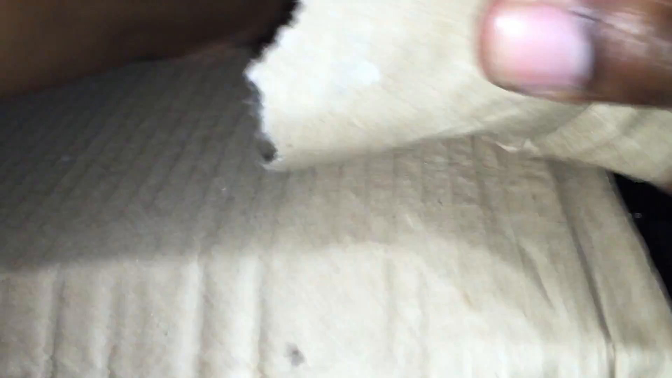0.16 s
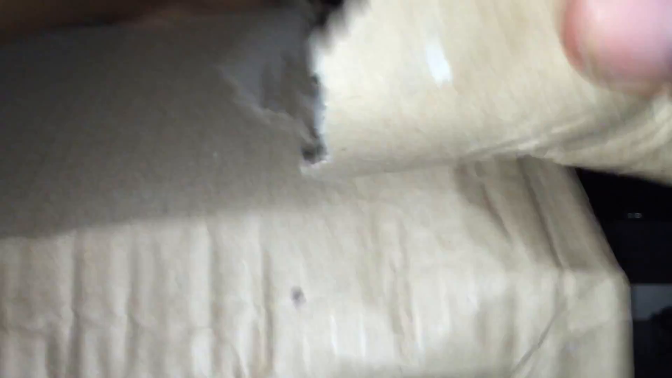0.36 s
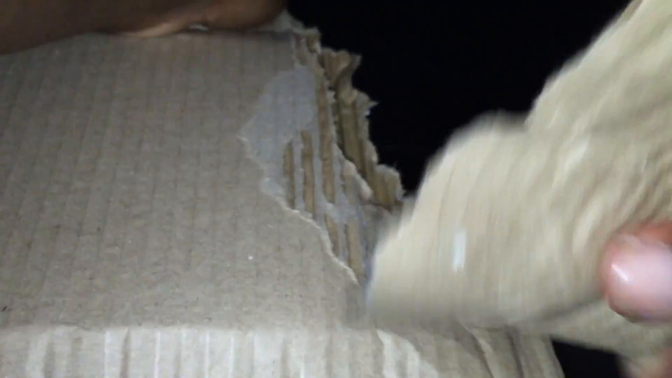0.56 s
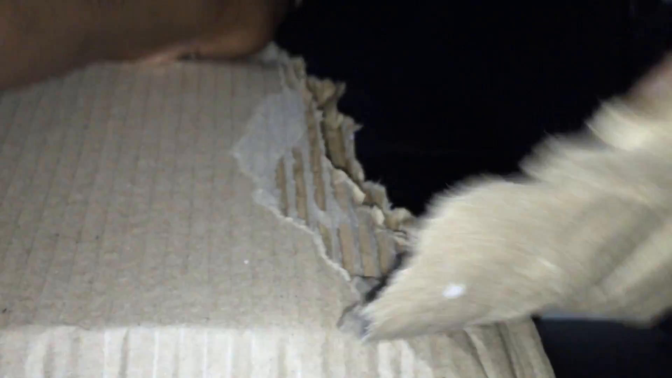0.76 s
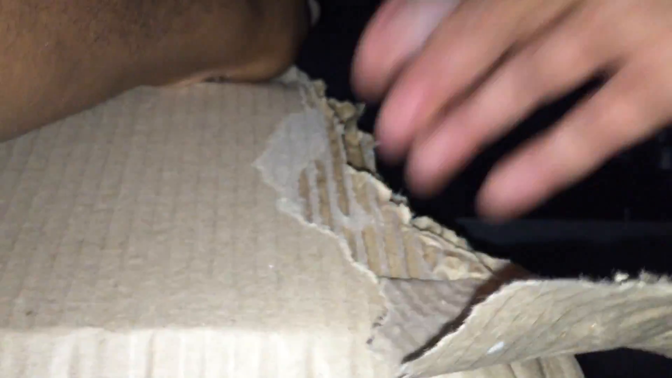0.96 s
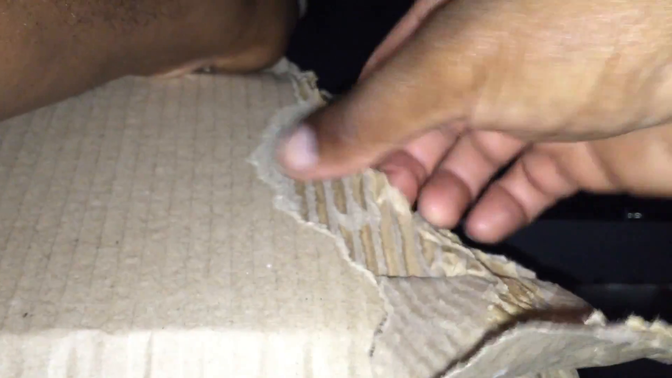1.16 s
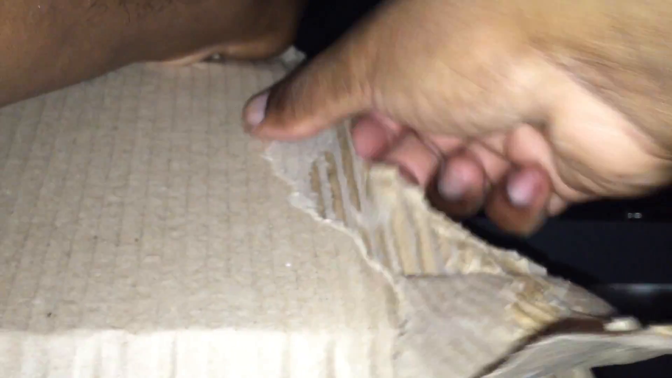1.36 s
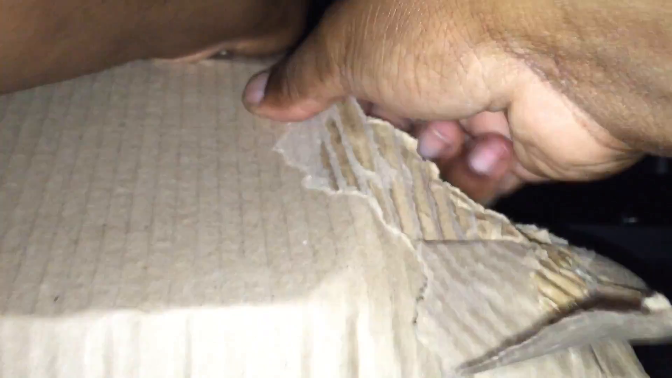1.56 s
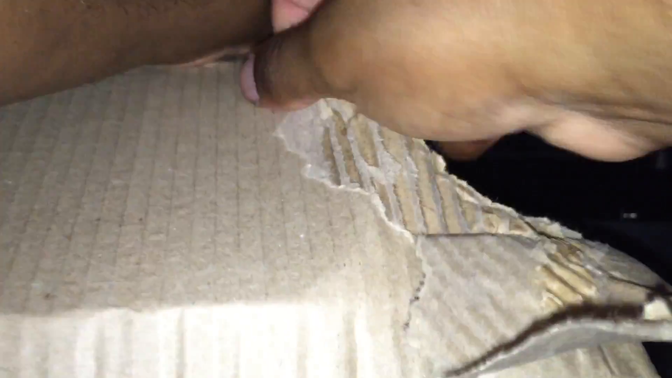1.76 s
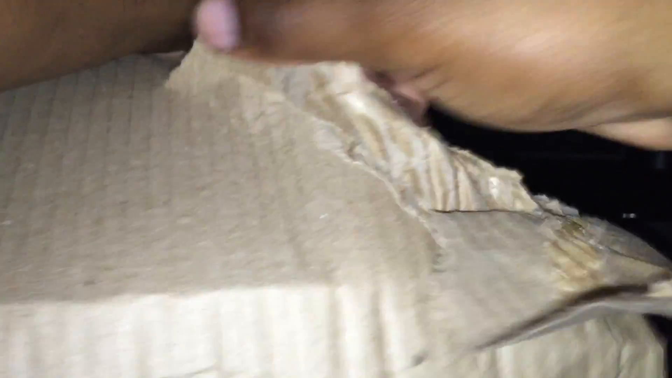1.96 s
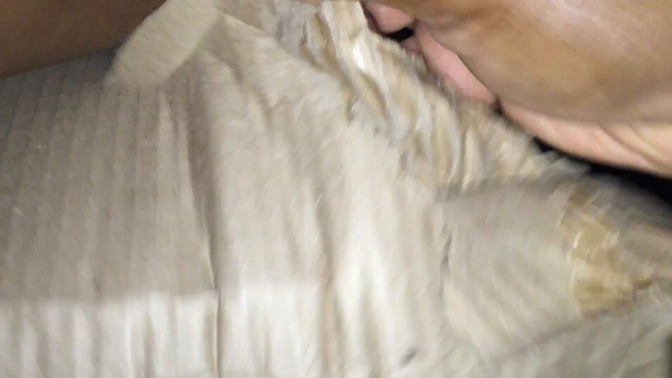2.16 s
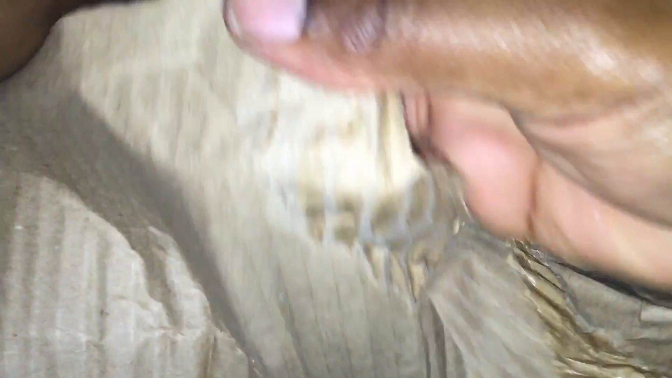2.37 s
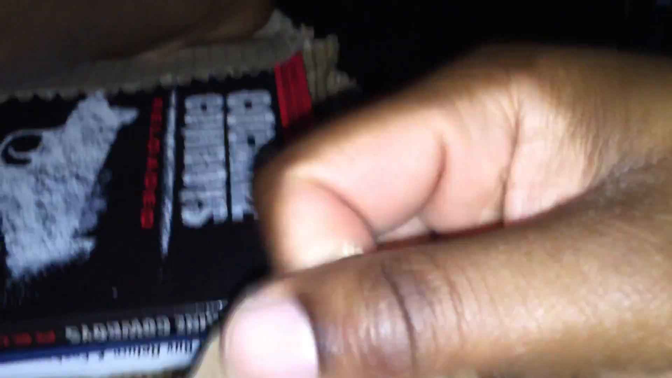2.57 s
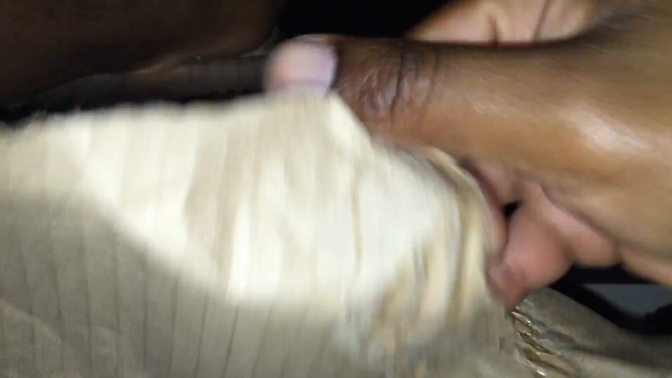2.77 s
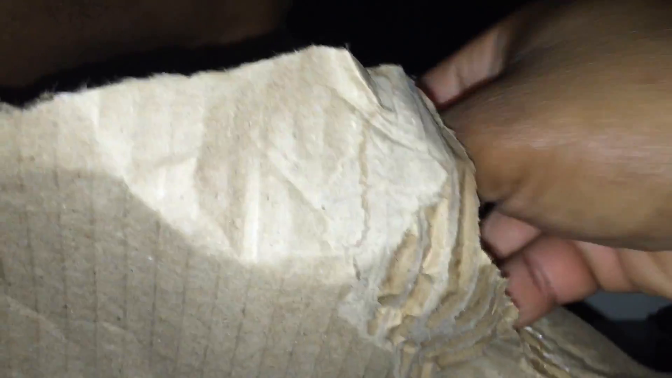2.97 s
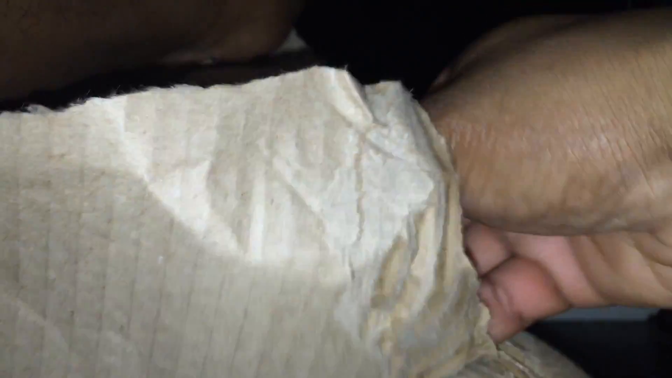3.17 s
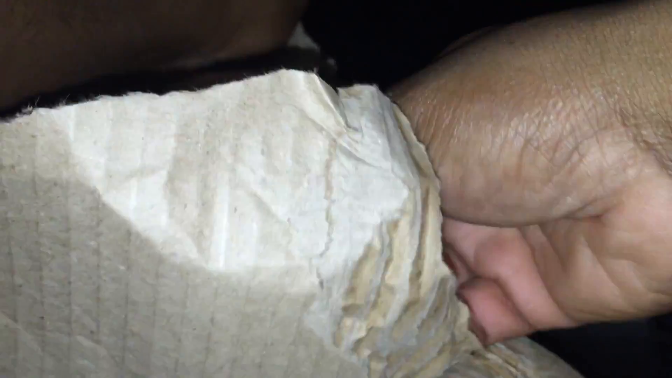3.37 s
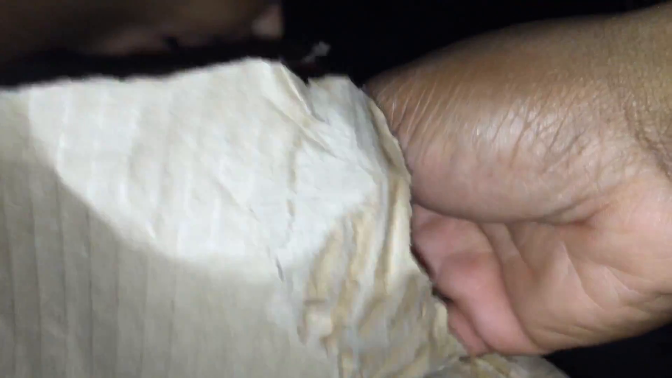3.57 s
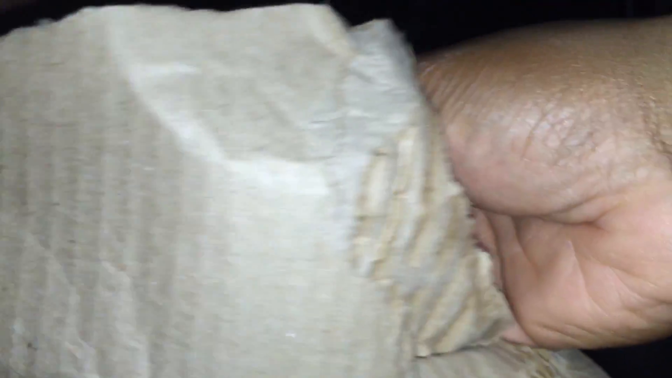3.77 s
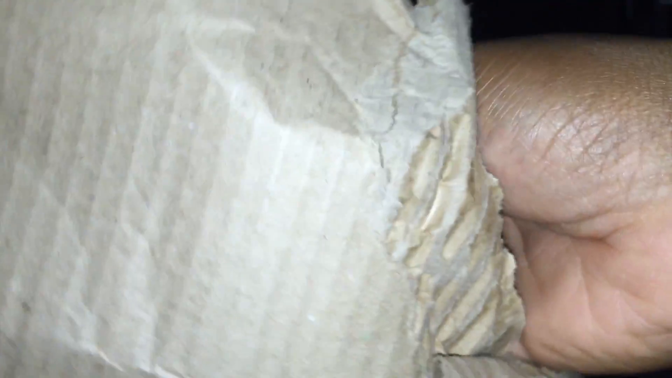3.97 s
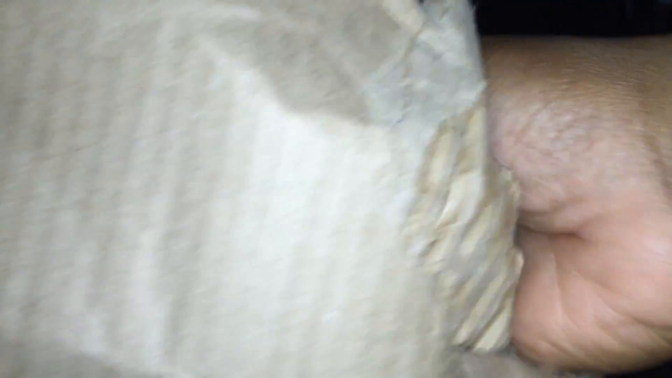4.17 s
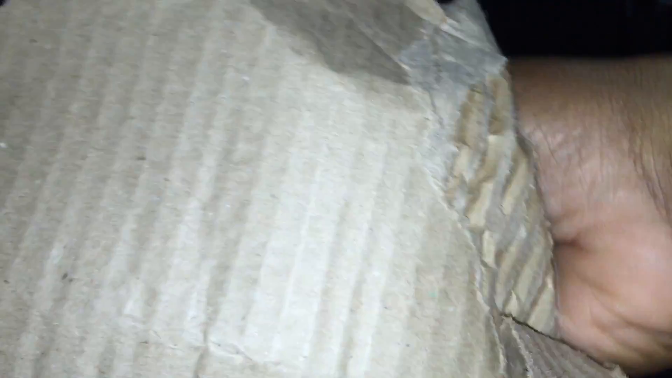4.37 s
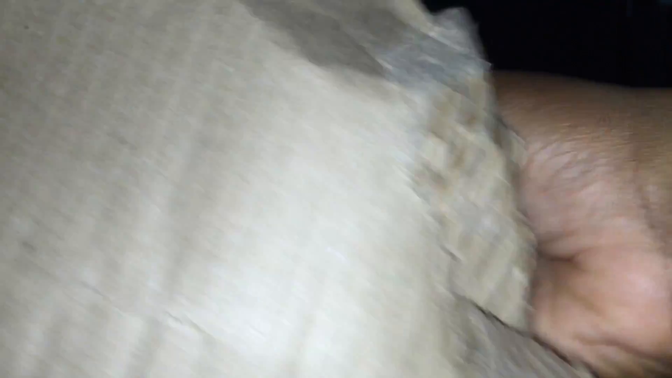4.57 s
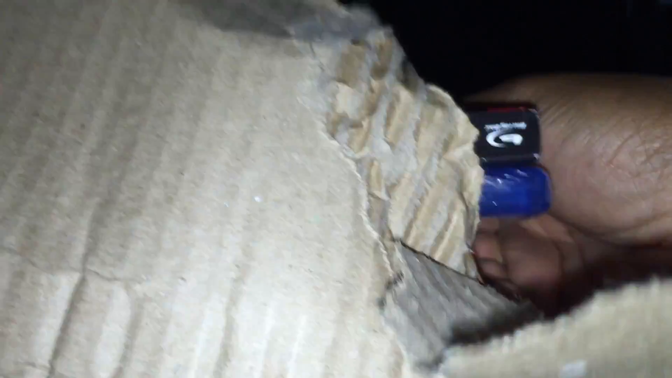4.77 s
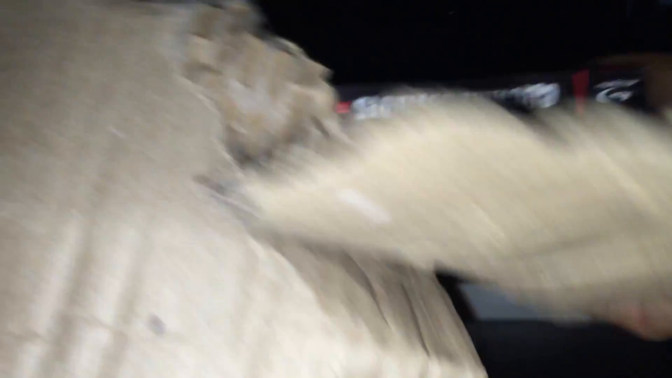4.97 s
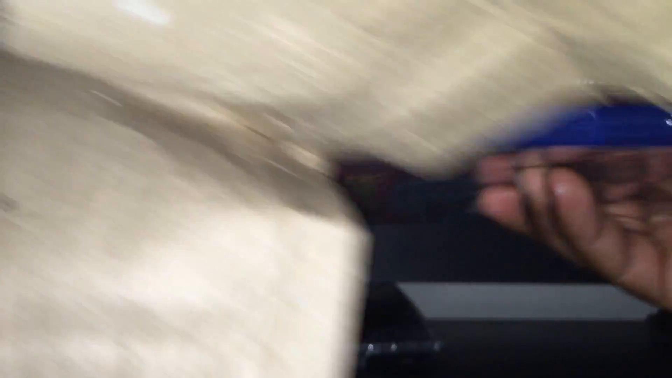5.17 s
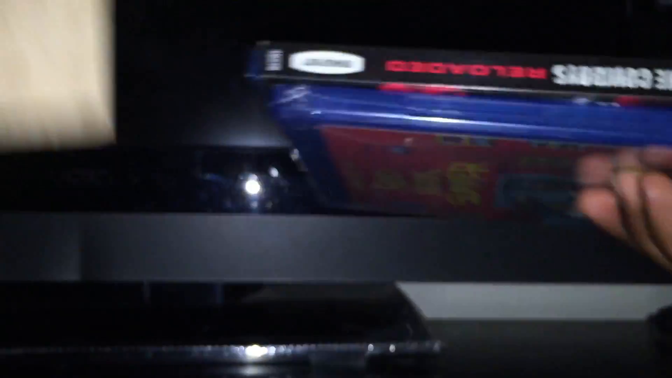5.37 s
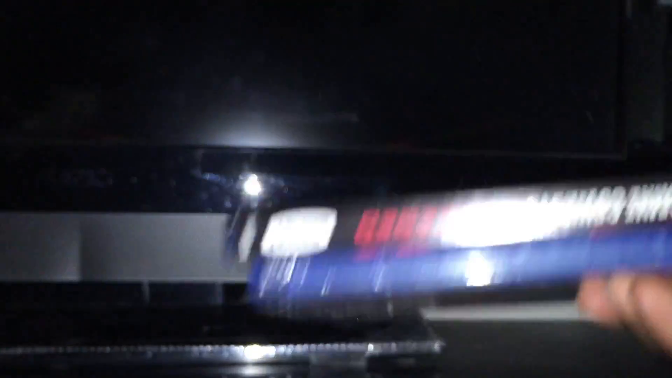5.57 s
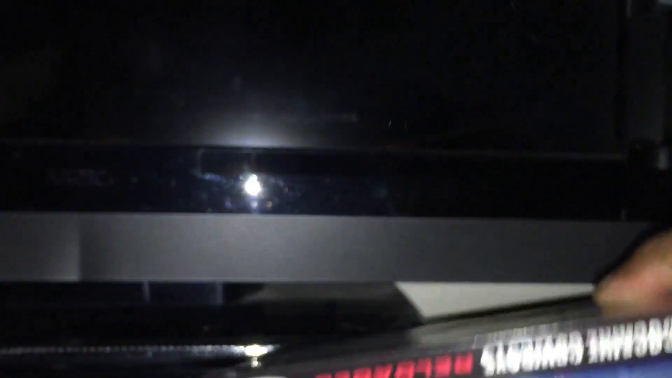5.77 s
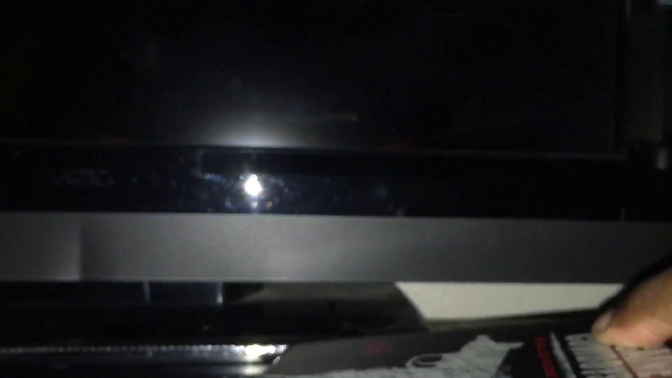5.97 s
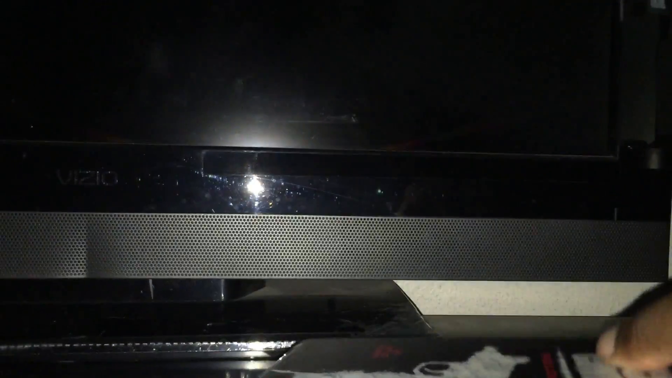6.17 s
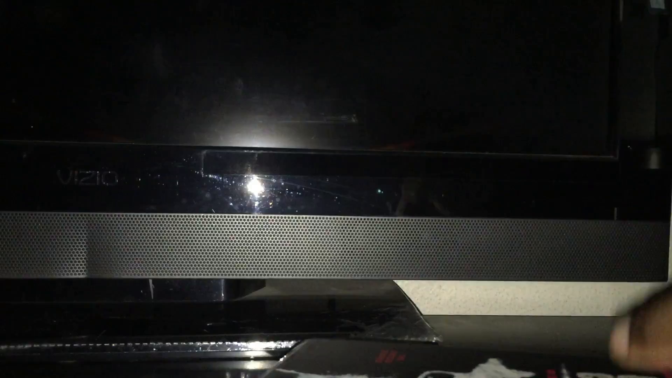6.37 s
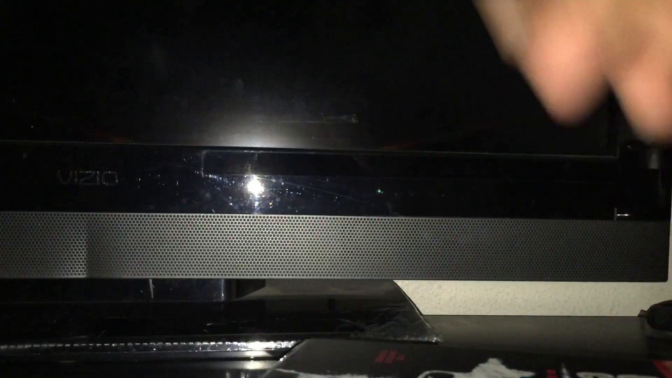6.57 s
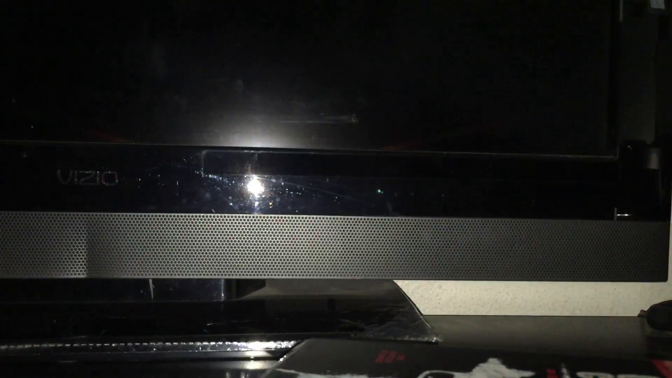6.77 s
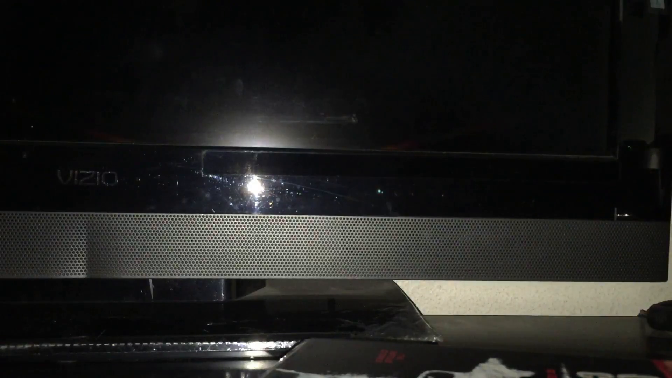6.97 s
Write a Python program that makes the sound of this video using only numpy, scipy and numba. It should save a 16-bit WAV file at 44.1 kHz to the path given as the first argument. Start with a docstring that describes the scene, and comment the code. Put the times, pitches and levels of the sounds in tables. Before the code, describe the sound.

Coarse, crackling rips of thick cardboard open the scene, with low panel thuds underneath. Quiet handling and little creases lead to a second, denser run of tearing. Then skin and plastic drag over paper in uneven strokes, growing toward the pull-out, with tiny clicks. Finally a light plastic case taps and clacks onto a shelf. Close dry microphone, short room tail, faint still air.

```python
"""A corrugated cardboard wrapper is ripped open by hand, close to the microphone in a small room.
Dense bursts of fibre clicks ring the loose flap, flutes crack and the panels flex with low thuds.
Friction grains and crinkles follow the hand, and a plastic disc case that is slid out, its edge clicking.
Damped modes knock as the case is set down on a shelf; a short room tail and still air lie around it all."""
import sys
import numpy as np
from scipy import signal
from scipy.fft import rfft, irfft, next_fast_len
from scipy.io import wavfile
from scipy.ndimage import map_coordinates
from numba import njit

SR = 44100
rng = np.random.default_rng(int(sys.argv[2]) if len(sys.argv) > 2 else 0)


def int16_out(signal):
    """Quantize to a 16-bit WAV file."""
    q = np.round(np.clip(np.atleast_2d(signal).T, -1, 1) * 32767)
    wavfile.write(sys.argv[1], SR, q.astype(np.int16))


N = 309581
T = np.arange(N) / SR

# the pulls that make up each rip, one list a rip, levels ahead of the layer trims:
# start_s, attack_s, hold_s, level_db, panel_flex_db (relative), treble_db (relative)
RIPS = [
    [(0.0, 0.001, 0.039, -17.5, -4, -5.5)],
    [(.118, 0.0034, 0.053, -37, -14.5, -0.5), (.13, 0.11, 0.019, -19, -6.5, -2),
     (.26, 0.017, .03, -23.5, -4.5, -7)],
    [(.355, .06, 0.022, -34, -18, -2.5), (.41, 0.032, 0.025, -24.5, -16, -3),
     (.453, 0.0041, .028, -19, -11, -5), (.505, 0.0027, 0.0041, -20.5, -11, -6)],
    [(1.805, 0.021, 0.061, -34.5, -8, 2), (1.89, 0.057, 0.015, -33.5, -19.5, -1.5),
     (1.962, .025, 0.046, -18.5, -8, -2.5)],
    [(2.225, .012, .018, -35, -13, 2.5), (2.25, 0.025, 0.067, -19, -26, -5.5),
     (2.335, 0.018, 0.035, -17, -19.5, -6.5), (2.38, 0.032, 0.066, -21, -11.5, -5)],
    [(2.518, .022, .014, -25.5, -8, -3.5), (2.562, .016, .012, -19, -7, -5),
     (2.6, 0.007, 0.011, -27, -13.5, -3), (2.621, .004, 0.018, -17.5, -9.5, -7),
     (2.65, 0.0091, 0.026, -31, -11, -4.5)],
]


def undb(db):
    """Decibels to gain."""
    return 10 ** (np.asarray(db) / 20)


def unit(x):
    """Scale to rms 1."""
    return x / np.sqrt(np.mean(x ** 2) + 1e-20)


def unit_hit(x):
    """Scale a short sound to the energy of 10 ms at rms 1."""
    return x / np.sqrt(np.sum(x ** 2) / (SR / 100))


def add(out, start_s, x):
    """Mix x into out from start_s on."""
    i = max(int(start_s * SR), 0)
    out[i:i + len(x)] += x[:max(len(out) - i, 0)]


def colour(x, points):
    """Filter by an outline of (Hz, dB) points, joined along log frequency."""
    hz, db = np.transpose(points)
    size = next_fast_len(len(x))
    f = np.maximum(np.fft.rfftfreq(size, 1 / SR), 1)
    gain = undb(np.interp(np.log(f), np.log(hz), db))
    return irfft(rfft(x, size) * gain, size)[:len(x)]


def band(x, lo_hz, hi_hz):
    """Causal band-pass."""
    edges = [lo_hz, min(hi_hz, SR / 2 - 100)]
    return signal.sosfilt(signal.butter(2, edges, "band", fs=SR, output="sos"), x)


def split(x, hz):
    """The parts below and above hz, without phase shift."""
    low = signal.sosfiltfilt(signal.butter(4, hz, fs=SR, output="sos"), x)
    return low, x - low


def resonate(x, peaks):
    """Parallel resonances (Hz, width Hz, dB), none narrower than 40 Hz."""
    out = 0
    for hz, width, db in peaks:
        b, a = signal.iirpeak(hz, hz / np.clip(width, 40, hz), fs=SR)
        out = out + undb(db) * signal.lfilter(b, a, x)
    return out


def walk(n, rate):
    """Slow chance with a spread near 1, from rate random knots a second."""
    knots = rng.standard_normal(int(n * rate / SR) + 2)
    return np.sqrt(3 / 2) * np.interp(np.arange(n) * rate / SR, np.arange(len(knots)), knots)


def swell(t, rise_s, decay_s):
    """A quick build-up and an exponential decay."""
    return (1 - np.exp(-(t / rise_s) ** 2)) * np.exp(-t / decay_s)


def snaps(n, rate, spread_db):
    """Random tiny clicks, rate a second, many small and a few large."""
    size = undb(spread_db * np.minimum(rng.exponential(size=n), 4))
    return (rng.random(n) < rate / SR) * size * rng.choice([-1, 1], n)


def burst(t, rise_s, decay_s):
    """A short spray of tiny breaks: random signs under a swell."""
    return rng.choice([-1, 1], len(t)) * swell(t, rise_s, decay_s)


def crackle(n, rate, mid_hz, ring_s, spread_db):
    """Coarse fibre bundles give way one by one, each pinging a scrap of paper of its own size."""
    out, t = np.zeros(n), T[:SR // 60]
    for when, pitch, size in rng.random((max(int(rate * n / SR), 1), 3)):
        hz = mid_hz * 2 ** (3.4 * (pitch - .5))
        ping = np.sin(2 * np.pi * hz * t) * swell(t, rise_s=0.0002, decay_s=ring_s)
        # higher pings are weaker
        add(out, when * n / SR, undb(spread_db * size) * ping * np.sqrt(mid_hz / hz))
    return unit(out)


def flicker(x, depth_db, rate):
    """Every bunch of fibres has its own colour: the octaves swell separately."""
    out = 0
    for hz in 700 * 2 ** np.arange(5):
        low, x = split(x, hz)
        out = out + low * undb(depth_db * walk(len(x), rate))
    return out + x


def bend(x, share, rate):
    """A bending sheet lets its resonances wander in pitch: time is stretched a little, to and fro."""
    i = np.arange(len(x))
    return map_coordinates(x, [i + np.cumsum(share * walk(len(x), rate))], order=3, mode="mirror")


@njit
def glide(x, hz, q):
    """State-variable band-pass whose centre moves."""
    y, b, l = np.empty(len(x)), 0., 0.  # output, band state, low state
    for i in range(len(x)):
        g = np.tan(np.pi * hz[i] / SR)
        v = (b + g * (x[i] - l)) / (1 + g * (g + 1 / q))
        b, l, y[i] = 2 * v - b, l + 2 * g * v, v / q
    return y


def still_air(level_db=-67.5):
    """Still air of the room: steady coloured noise."""
    # noise outline: pitch_hz, level_db
    air_outline = [(15, -49), (25, -13), (42, -2.5), (65, 6), (91, -7.5), (372, -19), (460, -20.5),
                   (703, -22), (4030, -28.5), (12900, -35.5), (14000, -36)]
    return undb(level_db) * unit(colour(rng.standard_normal(N), air_outline))


def effort(rows, sag_db_s, release_db_s, curve=1.006):
    """Each move builds up, holds while easing a little, and dies away; gains of body, panel flex and treble."""
    start, attack, hold, level_db, flex_db, treble_db = np.transpose(rows)[:, :, None]
    coarse = T[::40]
    t = coarse - start - attack
    rise = np.clip(1 + t / np.maximum(attack, 1 / SR), 0, 1) ** curve
    fall_db = sag_db_s * np.clip(t, 0, hold) + release_db_s * np.maximum(t - hold, 0)
    gain = rise * undb(level_db - fall_db)
    # overlapping moves add in power
    return np.array([np.interp(T, coarse, np.linalg.norm(gain * undb(db), axis=0))
                     for db in (0, flex_db, treble_db)])


def flex(n, rate, jerk_db, face_db=-3):
    """The panels give way in small jerks, each a low thud that sets the broad face ringing."""
    # colour of the flexing panels: pitch_hz, level_db
    panel_outline = [(25, -25), (50, 0.5), (80, -3.5), (120, 0.5), (180, -2), (240, -6), (320, -7.5),
                     (450, -11), (900, -38)]
    # resonances of the wrapper's broad face: pitch_hz, width_hz (40 at least), level_db
    face_peaks = [(105.9, 74, -2), (194, 45, 1.5), (338, 35, 2)]
    jerks = snaps(n, rate, spread_db=1.5) * undb(jerk_db * walk(n, rate=36))
    thuds = colour(jerks, panel_outline)
    return unit(unit(thuds) + undb(face_db) * unit(resonate(thuds, face_peaks)))


def tearing(rips, tear_db=-1.4, flap_db=-3, bundle_db=-6, flute_db=-9, flex_db=-4, treble_db=0):
    """Fibres snap by the thousand, in bunches as the tear catches on the flutes; they ring the flap."""
    # resonances of the flap, which changes size from rip to rip: pitch_hz, width_hz, level_db
    flap_peaks = [
        [(863, 83, -1), (1340, 100, 4), (2390, 400, 4), (3280, 79, 15), (6330, 400, -3)],
        [(872, 220, -10.5), (2285, 240, 5), (3280, 190, 5), (6470, 790, -12.5)],
        [(922, 130, -8), (2380, 240, 11), (3380, 260, 2), (5970, 1000, -13)],
        [(1260, 280, 0.5), (1950, 370, 10), (3155, 200, 13), (4080, 330, -9), (5200, 780, -14)],
        [(950, 60, 12), (1800, 400, -1.5), (3100, 960, 2.5), (3970, 930, -7)],
        [(700, 370, 6.5), (2170, 110, 11.5), (2790, 490, 11.5), (3810, 350, 5.5), (6660, 670, 6)],
    ]
    # colour of snapping fibres: pitch_hz, level_db
    fibre_outline = [(150, -35.5), (250, -1), (496, -5.5), (919, 1.5), (1050, -3), (1650, -6), (2240, -0.5),
                     (2950, 2), (3380, 1), (4930, -7), (6480, -9), (10500, -14), (13500, -13.5),
                     (15000, -17)]
    out = np.zeros(N)
    n = SR // 2  # each rip gets half a second
    for pulls, gains, flap in zip(RIPS, rips, flap_peaks):
        start = max(pulls[0][0], 0)
        body_gain, flex_gain, treble_gain = gains[:, int(start * SR):][:, :n]
        catch = undb(0.31 * walk(n, rate=130) + 2.0 * walk(n, rate=600))
        fibres = flicker(snaps(n, rate=5000, spread_db=2.5) * catch, depth_db=-0.5, rate=81)
        body, treble = split(colour(fibres, fibre_outline), hz=5270)
        ring = bend(resonate(fibres, flap), share=.005, rate=35)
        bundles = crackle(n, rate=350, mid_hz=3857, ring_s=0.0021, spread_db=10)
        flutes = crackle(n, rate=76, mid_hz=1580, ring_s=0.0018, spread_db=6.5)
        body = unit(body) + undb(flap_db) * unit(ring)
        body = unit(body + undb(bundle_db) * bundles + undb(flute_db) * flutes)
        rip = body_gain * undb(tear_db) * body
        rip = rip + treble_gain * undb(treble_db) * unit(treble)
        rip = rip + flex_gain * undb(flex_db) * flex(n, rate=900, jerk_db=2.5)
        add(out, start, rip)
    return out


def crack(body_db, hz, thud_db, snap_db, ring_db=0, sag_db=-10, sag_hz=80):
    """A sharp snap, a brief ring and a low thud, as when a flute buckles and its liner and panel answer."""
    t = T[:SR // 12]
    ring = np.sin(2 * np.pi * hz * t) * swell(t, rise_s=0.00095, decay_s=0.002)
    # a larger, lower-ringing patch also gives a duller crack
    top_hz = np.clip(2.28 * hz, 900, 4200)
    spray = unit_hit(band(burst(t, rise_s=0.0011, decay_s=.0018), 600, top_hz))
    body = unit_hit(spray + undb(ring_db) * unit_hit(ring))
    snap = unit_hit(band(burst(t, rise_s=0.001, decay_s=0.00095), 2400, 13500))
    thud = unit_hit(band(burst(t, rise_s=0.0013, decay_s=0.0081), 110, 270))
    # the panel springs back and swings a few slow cycles
    sag = unit_hit(np.sin(2 * np.pi * sag_hz * t) * swell(t, rise_s=0.005, decay_s=0.015))
    thud = unit_hit(thud + undb(sag_db) * sag)
    return undb(body_db) * body + undb(snap_db) * snap + undb(thud_db) * thud


def small_cracks(work, rate=18, top_db=-5.5, spread_db=4, mid_hz=1710, thud_db=-10, snap_db=-6, spread_oct=.6):
    """Lesser creases give way at random, rate a second, as strongly as the card is being worked."""
    out = np.zeros(N)
    for when, size, pitch in rng.random((int(rate * N / SR), 3)):
        hz = mid_hz * 2 ** (spread_oct * (2 * pitch - 1))
        gain = work[int(when * N)] * undb(top_db + spread_db * (2 * size - 2))
        add(out, when * N / SR, gain * crack(0, hz, thud_db, snap_db))
    return out


def cracks_and_edge_clicks(body_db=0, thud_db=0, snap_db=0):
    """Flutes and creases buckle; the last four are clicks of the case edge catching as it slides free."""
    # start_s, body_db, ring_hz, thud_db, snap_db
    crack_rows = [(0.1227, -45, 910, -48.5, -38), (0.2324, -15.5, 2380, -30, -25.5),
                  (0.4585, -19.5, 3830, -34, -20), (0.4824, -21.5, 3450, -33, -35),
                  (0.664, -43, 790, -38, -58), (0.8139, -32.5, 2900, -30.5, -40.5),
                  (0.999, -59, 2080, -77.5, -69.5), (1.175, -41.5, 1250, -37, -48),
                  (1.284, -30, 1960, -43, -46), (1.3146, -39, 1400, -56, -55),
                  (1.556, -27.5, 1450, -29, -42), (1.593, -35.5, 1360, -60.5, -53),
                  (1.672, -20, 2010, -32.5, -50), (1.7368, -33.5, 1160, -58, -48),
                  (1.8152, -26.5, 2910, -38, -37), (1.9423, -29.5, 2704, -44.5, -33),
                  (1.982, -27, 1290, -28, -27), (2.0175, -21.5, 3570, -30.5, -32),
                  (2.0256, -23.5, 1300, -31.5, -33), (2.1007, -29.5, 2400, -44, -41),
                  (2.263, -25, 1920, -39, -40), (2.474, -28, 4500, -26.5, -46),
                  (2.5038, -22.5, 2880, -32, -25.5), (2.577, -21, 3460, -22, -21),
                  (2.6248, -20.5, 780, -22, -18), (2.77, -41, 2370, -58, -36),
                  (2.8734, -31.5, 1160, -36.5, -35), (2.9126, -34, 610, -47, -35.5),
                  (3.3304, -30.5, 594, -31.5, -60), (3.5272, -42, 1000, -43, -58),
                  (4.3232, -40.5, 1100, -45, -55), (4.2488, -34.5, 730, -34, -61),
                  (4.7215, -22, 1680, -53, -21.5), (4.768, -29, 1430, -34, -52),
                  (4.8534, -35, 725, -39, -60), (4.9826, -36, 680, -40, -60),
                  (5.2741, -32.5, 785, -36, -59), (5.286, -33.5, 790, -42, -58),
                  (5.352, -35.5, 2620, -40, -56), (5.3578, -38, 1810, -44, -53),
                  (5.3786, -38.5, 1530, -49, -63), (5.393, -34, 1470, -41, -65)]
    out = np.zeros(N)
    for start, mid_db, hz, low_db, high_db in crack_rows:
        add(out, start, crack(mid_db + body_db, hz, low_db + thud_db, high_db + snap_db))
    return out


def bumps(rise_s=0.0043, decay_s=0.015):
    """A whole panel springs back when it is let go, swinging a few deep cycles."""
    # start_s, level_db, pitch_hz
    releases = [(.335, -44, 80), (0.794, -36, 105), (.848, -37, 85), (3.101, -43.5, 133), (3.176, -40, 154),
                (3.329, -37.5, 55), (4.776, -31, 58), (5.3, -41, 87)]
    out, t = np.zeros(N), T[:SR // 6]
    for start, db, hz in releases:
        swing = np.sin(2 * np.pi * hz * t) * swell(t, rise_s, decay_s)
        add(out, start, undb(db) * unit_hit(swing))
    return out


def sliding(body_gain, flex_gain, hiss_gain, rub_db=0, hiss_db=0, flex_db=-1, patch_db=-4, crinkle_db=-8,
            press_db=8, patch_mid_hz=1400, patch_drop_oct=0.33, patch_wander_oct=0.2):
    """Skin and plastic drag over the paper: fine friction grains and crinkles, panels rumbling under them."""
    # colour of rubbed card: pitch_hz, level_db
    rub_outline = [(150, -34), (280, -5.5), (430, 0.5), (600, 1), (1000, -1), (1400, -4.5), (2100, 4),
                   (2700, 5.5), (3700, -3), (4900, -10), (6400, -9.5), (8500, -13), (13000, -19),
                   (14400, -35.5)]
    # the emptying wrapper rings like a flat tube: pitch_hz, width_hz, level_db
    tube_peaks = [(710, 700, 0.5), (925, 65, -4.5), (1330, 73, 3), (1824, 92, -7)]
    # how strongly the tube rings as it opens: time_s, level_db
    tube_opening = [(4.1, -15), (4.3, -17), (4.65, -16), (4.85, 0.5), (5.1, -4), (5.3, -7.5), (5.5, -8)]
    # a hand that presses hard enough to flex the panel also sticks and slips more
    press = np.clip(np.sqrt(undb(press_db) * flex_gain / (body_gain + 1e-12)), .45, 1.3)
    stick_slip = press * (0.79 * walk(N, rate=83) + 0.57 * walk(N, rate=280))
    grip = undb(stick_slip + 1.64 * walk(N, rate=26))
    grains = flicker(snaps(N, rate=14000, spread_db=2.0) * grip, depth_db=2.0, rate=35)
    body, hiss = split(colour(grains, rub_outline), hz=3690)
    # pressing harder widens the patch of card under the hand and lowers its ring
    patch_oct = patch_wander_oct * walk(N, rate=12) - patch_drop_oct * np.log2(press)
    patch = glide(grains, patch_mid_hz * 2 ** patch_oct, 3.)
    crinkles = press * crackle(N, rate=130, mid_hz=1930, ring_s=0.0027, spread_db=18.5)
    body = unit(unit(body) + undb(patch_db) * unit(patch) + undb(crinkle_db) * crinkles)
    tube_gain = undb(np.interp(T, *np.transpose(tube_opening)))
    tube = unit(resonate(band(grains, lo_hz=520, hi_hz=2110), tube_peaks))
    # the tube partly replaces the plain rub
    body = (body + tube_gain * tube) / np.sqrt(1 + tube_gain + tube_gain ** 2)
    rub = body_gain * undb(rub_db) * body + hiss_gain * undb(hiss_db) * unit(hiss)
    return rub + flex_gain * undb(flex_db) * flex(N, rate=400, jerk_db=0.5)


def strike(t, modes, favoured_hz, octave_db=6):
    """Damped modes; the spot that is hit weights them by their distance from one pitch."""
    hz, db, t60 = np.transpose(modes)[:, :, None]
    sign = (-1) ** np.arange(len(hz))[:, None]
    gain = undb(db - octave_db * np.abs(np.log2(hz / favoured_hz))) * sign
    hz = hz * (1 + 0.012 * rng.standard_normal(hz.shape))  # each hit is slightly detuned
    return unit_hit(np.sum(gain * np.sin(2 * np.pi * hz * t) * 1000 ** (-t / t60), axis=0))


def knocks(thud_db=0, clack_db=0, click_db=0, tick_db=-2, lag_s=0.00099, wash_db=-13, wash_t60=0.22):
    """The case edge touches first; its shell and the shelf answer a moment later; the room adds an even tail."""
    # the case knocking on the shelf: start_s, shelf_thud_db, case_clack_db, edge_click_db, reference_pitch_hz
    contacts = [(5.571, -77, -70.5, -68, 2100), (5.645, -48, -48, -50.5, 1900),
                (5.8915, -41, -25.5, -31.5, 1150), (6.0379, -31, -24, -15.5, 2900),
                (6.3906, -31.5, -34.5, -28, 2000)]
    # modes of the shelf, the shell of the case and its edge, ahead of detuning: pitch_hz, level_db, t60_s
    shelf_modes = [(69.2, -8.5, 0.14), (118, -9.5, 0.079), (178, -5, 0.098), (211, -4, 0.16),
                   (325.4, 1.5, 0.023), (428, -5, 0.032)]
    shell_modes = [(593, -3, 0.031), (710, 2, 0.018), (960, 1.5, 0.015), (1285, 8.5, 0.013),
                   (1453, 7.5, 0.005)]
    edge_modes = [(1894, -2, .008), (2140, -9.5, 0.0036), (2400, -5.5, 0.0055), (2724, 8.5, 0.0029),
                  (3147, 0.5, 0.016), (3180, -0.5, 0.012), (5640, -12, .004)]
    # colour of the room's diffuse answer to a knock: pitch_hz, level_db
    wash_outline = [(120, -19), (300, 3), (800, -0.5), (2200, -3), (3500, -5), (5500, -14), (9000, -17.5),
                    (15000, -29)]
    out, t = np.zeros(N), T[:SR // 5]
    for start, low_db, mid_db, high_db, hz in contacts:
        tick = unit_hit(band(burst(t, rise_s=0.00026, decay_s=0.0012), 1380, 5700))
        edge = unit_hit(strike(t, edge_modes, hz) + undb(tick_db) * tick)
        add(out, start, undb(high_db + click_db) * edge)
        # negative octave_db favours modes away from the pitch
        shell = strike(t, shell_modes, hz, octave_db=-1.0)
        add(out, start + lag_s, undb(mid_db + clack_db) * shell)
        shelf = strike(t, shelf_modes, hz, octave_db=1.0)
        add(out, start + lag_s, undb(low_db + thud_db) * shelf)
        fade = swell(t, rise_s=0.0031, decay_s=wash_t60 / np.log(1000))
        wash = unit_hit(colour(rng.standard_normal(len(t)), wash_outline) * fade)
        add(out, start, undb((mid_db + high_db) / 2 + wash_db) * wash)
    return out


def near_hand(x, echo_db=-12, delay_s=0.0002266, sway=0.32):
    """The moving hand and flap throw back a very early echo that shifts the colour of the treble."""
    lag = delay_s * SR * np.exp(sway * walk(N, rate=5))
    bright = band(x, lo_hz=702, hi_hz=19600)
    echo = map_coordinates(bright, [np.arange(N) - lag], order=3, mode="mirror")
    return (x + undb(echo_db) * echo) / np.sqrt(1 + undb(echo_db) ** 2)


def room(x, wet_db, t60_low=0.16, t60_high=0.13):
    """A small furnished room: a few near echoes and a short diffuse tail, duller as it dies."""
    # first echoes from the box face, the shelf and the wall behind it: delay_s, level_db
    early_echoes = [(.0019, -26.5), (.0043, -22), (.0071, -31.5), (0.011, -21.5)]
    t = T[:SR // 3]
    low, high = split(rng.standard_normal(len(t)), hz=3730)
    tail = low * 1000 ** (-t / t60_low) + 0.53 * high * 1000 ** (-t / t60_high)
    tail = tail * (t > .004)
    response = undb(wet_db) * tail / np.sqrt(np.sum(tail ** 2))
    for delay_s, db in early_echoes:
        add(response, delay_s, [undb(db)])
    return x + signal.fftconvolve(x, response)[:N]


def scene():
    """The card is right at the microphone; the shelf is further off and wetter."""
    # strokes of hand or case over the card, then the shelf, levels ahead of the layer trims:
    # start_s, attack_s, hold_s, level_db, panel_flex_db (relative), hiss_db (relative)
    stroke_rows = [(.58, .03, .02, -58, -7.5, -6), (.625, .04, .15, -46.5, -2, 3),
                   (.87, .04, .12, -70.5, -3.5, -14), (.99, 0.1, 0.027, -45.5, -17, -13.5),
                   (1.14, 0.021, 0.087, -48, -3.5, -8), (1.25, 0.027, 0.0057, -36, -4, -12.5),
                   (1.35, 0.064, 0.13, -54.5, -12, -14), (1.44, 0.013, 0.0087, -37, -12.5, -6),
                   (1.52, 0.046, 0.036, -37, -9, -5.5), (1.61, 0.032, 0.1, -42.5, -10, -6),
                   (1.75, 0.034, .04, -50.5, -10, -5), (2.07, 0.05, 0.073, -44.5, -12, 1.5),
                   (2.69, 0.033, 0.29, -50, -3.5, -3), (2.766, 0.0025, .04, -39, -8, -6),
                   (2.87, 0.029, 0.097, -40, -2.5, -5.5), (3.05, 0.063, 0.093, -46.5, -1.5, -21),
                   (3.16, 0.1, .06, -38.5, -16.5, -10.5), (3.35, 0.041, 0.049, -36, -17.5, -11.5),
                   (3.45, 0.03, 0.046, -42, -7, -10), (3.545, 0.018, 0.016, -38, -1, -10),
                   (3.62, 0.036, 0.13, -39.5, -9.5, -7), (3.78, 0.076, .18, -43.5, -17.5, -5.5),
                   (4.05, 0.083, 0.16, -48, -17.5, -5), (4.2, 0.069, .085, -38.5, -4, -5),
                   (4.36, 0.066, 0.02, -34, -9, -3), (4.46, 0.12, 0.24, -45, -8, -10),
                   (4.64, 0.094, 0.021, -30.5, -4.5, -8), (4.755, 0.014, 0.019, -28.5, -7.5, -10),
                   (4.8, 0.018, 0.018, -37.5, -2.5, -8), (4.87, 0.094, 0.035, -58, 2, -13),
                   (4.955, 0.034, .06, -35, -7.5, -12), (5.035, .033, 0.013, -33, -2, -10.5),
                   (5.1, 0.033, 0.09, -42, -6, -9.5), (5.22, 0.051, 0.0046, -36.5, -5.5, -8.5),
                   (5.77, 0.049, 0.027, -59.5, -11.5, -7), (5.88, 0.025, .12, -47.5, -16, -13.5),
                   (6.2, .05, 0.11, -66, -6.5, -3.5)]
    air = still_air()
    # a running tear eases slowly and stops fast; a sliding hand dies away more gently
    rips = [effort(pulls, sag_db_s=26, release_db_s=521) for pulls in RIPS]
    strokes = effort(stroke_rows, sag_db_s=20.5, release_db_s=306.5)
    work = (sum(rips) + strokes)[0]
    card = tearing(rips) + small_cracks(work) + cracks_and_edge_clicks() + bumps() + sliding(*strokes)
    # the microphone's low cut takes away the deep bass of the card
    card = band(card, lo_hz=42, hi_hz=20000)
    shelf = room(knocks(), wet_db=-18.5, t60_low=.2, t60_high=.18)
    return (room(near_hand(card), wet_db=-20.5) + shelf + air)[None]


def record(dry, ceiling=0.64, port_db=-15, top_hz=15200):
    """A reflection in the microphone port dips the treble; the recorder rounds high peaks and cuts the top."""
    inner = np.pad(dry, ((0, 0), (17, 0)))[:, :N]  # 17 samples late
    heard = dry - undb(port_db) * band(inner, lo_hz=1477, hi_hz=19400)
    rounded = ceiling * np.tanh(heard / ceiling)
    return signal.sosfilt(signal.ellip(8, .2, 70, top_hz, fs=SR, output="sos"), rounded)


dry = scene()
out = record(dry)
int16_out(out)
```